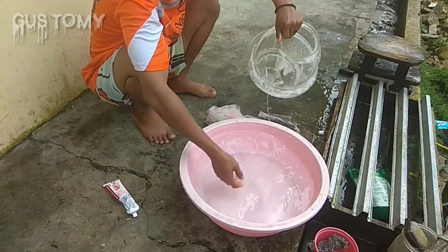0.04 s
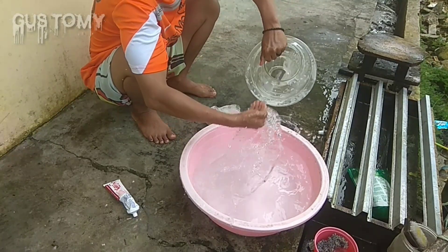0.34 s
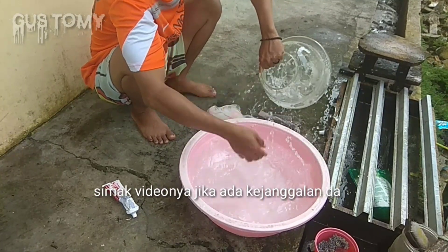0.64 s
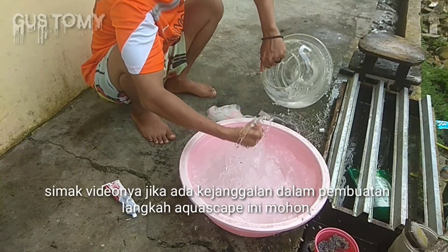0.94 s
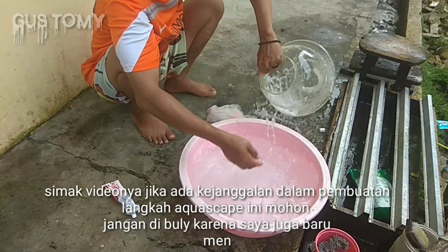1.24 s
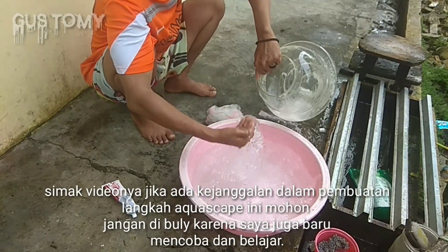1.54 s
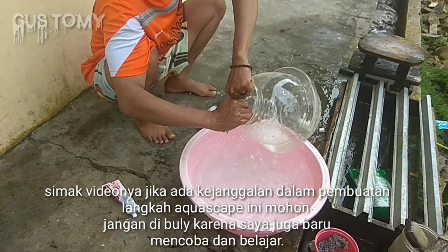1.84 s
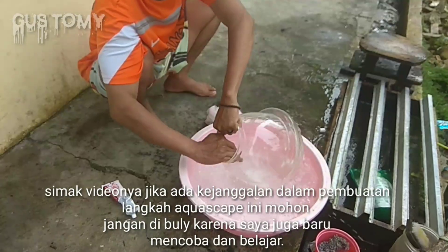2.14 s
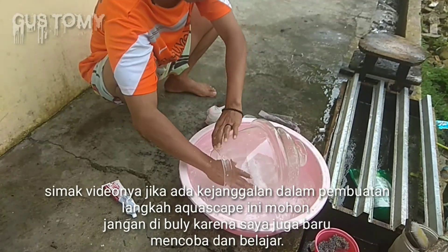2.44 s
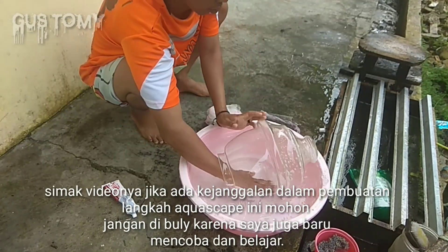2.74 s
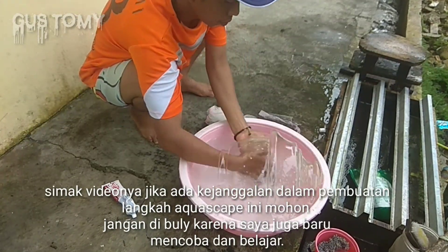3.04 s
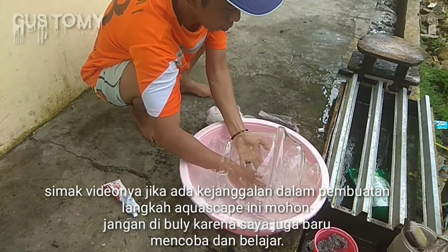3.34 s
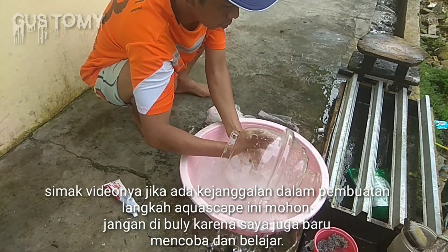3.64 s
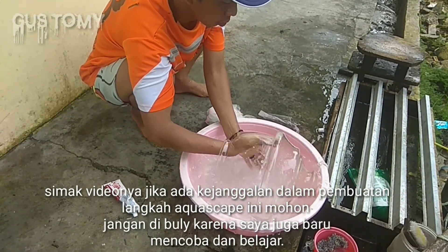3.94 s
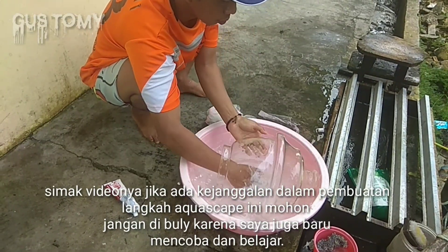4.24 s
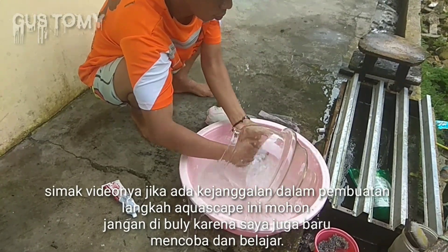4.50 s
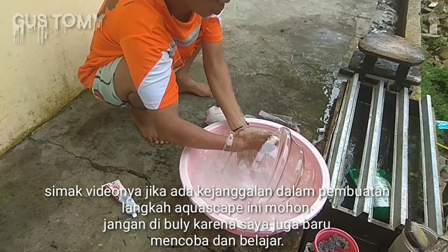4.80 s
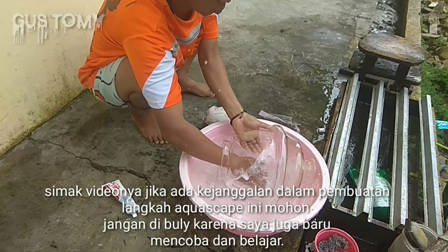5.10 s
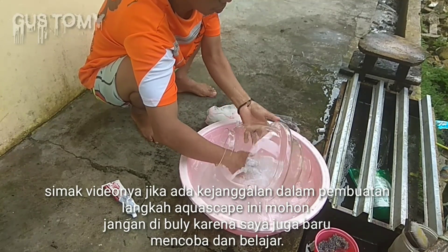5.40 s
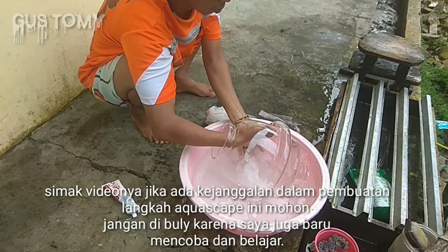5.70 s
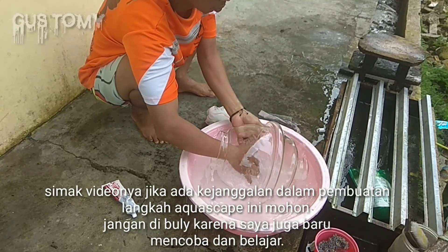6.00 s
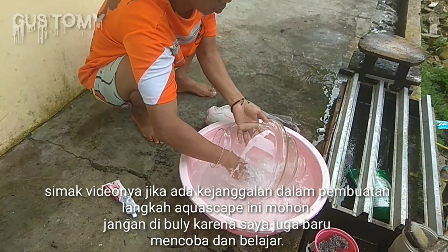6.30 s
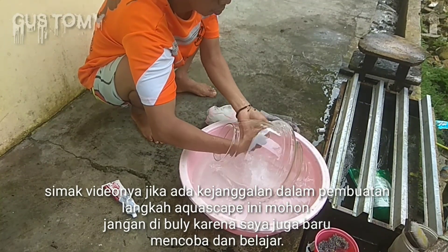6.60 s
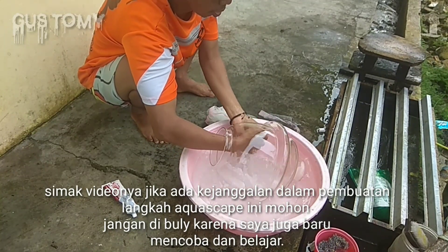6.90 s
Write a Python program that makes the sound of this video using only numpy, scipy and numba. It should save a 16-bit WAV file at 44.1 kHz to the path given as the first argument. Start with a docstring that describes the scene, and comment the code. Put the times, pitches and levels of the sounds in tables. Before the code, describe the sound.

Water sloshes, bubbles and sprays in a plastic basin for about seven seconds as a big glass bowl is rinsed by hand, close and straight ahead in a yard. Hollow gulps and plops open at about 0.3 seconds. Spilled water slaps on wet concrete in sharp, separate splats, several a second from about 1 second, easing between 4.3 and 5, then carrying on to the end. The bowl knocks twice on the basin just after 2 seconds. Bangles tick brightly against the glass now and then, clearest near 0.3, 2.2, 4.5 and 7 seconds. Stronger gulps of trapped air come at about 4.3, 6.1 and 6.9 seconds, and the glass gives one very faint ring at 5.5. Echoes are slight and short. Behind it all, insects keep up a steady high hiss over a faint, distant rumble.

```python
"""Water sloshes in a plastic basin as a big glass bowl is rinsed by hand on a concrete yard.
The water is made of ringing bubbles and tiny drops. The bowl pushes out gulps of air, knocks on the
basin and rings faintly once; bangles tick against the glass. Nearby, slugs of water (small, separate
masses) slap on wet concrete. Insects hiss steadily in the greenery over a faint, distant rumble."""
import sys
import numpy as np
from scipy import signal
from scipy.fft import rfft, irfft, next_fast_len
from scipy.io import wavfile
from scipy.ndimage import uniform_filter1d
from numba import njit

SR = 44100
rng = np.random.default_rng(int(sys.argv[2]) if len(sys.argv) > 2 else 0)


def wrap_up_sound(samples):
    """Save the sound to the file named by the first command line argument, as 16-bit audio."""
    columns = np.atleast_2d(samples).T
    # keep every value between -1 and 1, then stretch to whole-number steps
    tamed = np.clip(columns, -1, 1)
    steps = np.round(tamed * 32767).astype(np.int16)
    wavfile.write(sys.argv[1], SR, steps)


N = 315315
TIME = np.arange(N) / SR
LEFT_RIGHT = np.array([[1], [-1]])   # adds on the left, subtracts on the right

# Levels in dB are relative. A t60 is the time a sound takes to fade by 60 dB.
# hand or bowl pushes into the water: start_s, gulp_db, boom_db, gulp_t60_s, boom_hz
GULPS = [(.258, -33, -59, 0.13, 194), (0.282, -36.5, -44, 0.75, 195), (0.344, -30.5, -60, 0.14, 198),
         (0.991, -39.5, -65, 0.33, 185), (2.088, -45, -36, 0.096, 165.5), (2.189, -57, -46, 0.13, 156),
         (3.332, -47, -47, 0.047, 184), (3.539, -36, -53, 0.086, 196.5), (4.337, -21, -40, 0.084, 202),
         (4.365, -42, -34, 0.57, 197), (4.756, -34, -38.5, 0.066, 187), (4.84, -35, -46, 0.17, 180),
         (6.094, -26, -52, 0.082, 198), (6.124, -49, -37.5, 0.26, 211.5), (6.513, -32.5, -47, 0.25, 200),
         (6.948, -22.5, -44, 0.045, 192), (6.972, -40, -41, 0.29, 222)]
# slugs of water hit the concrete: start_s, crack_db, treble_db, ping_db, pocket_db
SLAPS = [(0.2824, -22, -37, -45, -43), (0.5405, -27, -42, -42, -33), (0.9928, -28.5, -27, -45, -36),
         (1.1397, -28.5, -26, -11.5, -28), (1.208, -47, -44, -45, -27), (1.372, -32.5, -25, -16.5, -27),
         (1.5121, -33, -27, -14.5, -32), (1.757, -31, -41, -22, -45), (1.827, -27, -25, -18, -35),
         (1.9888, -27.5, -29, -20.5, -26), (2.128, -27.5, -29, -17.5, -26), (2.199, -27, -31, -20, -20),
         (2.398, -25, -34, -23, -27), (2.469, -28.5, -42, -27, -32), (2.601, -22.5, -40, -19.5, -22.5),
         (2.682, -26, -31, -23, -22), (2.83, -29.5, -31, -23, -22), (2.9026, -25, -35, -27, -23),
         (3.0133, -30.5, -32, -38, -24), (3.163, -28.5, -26.5, -32, -21), (3.323, -30.5, -42, -34, -24),
         (3.4815, -30, -28.5, -27, -26), (3.706, -24.5, -28.5, -35, -17.5), (3.802, -29, -31, -38, -24),
         (3.954, -29.5, -27, -25, -19), (4.059, -27.5, -25, -32, -18), (4.2713, -30.5, -29.5, -28, -20),
         (4.4778, -44, -31, -40, -48), (4.9052, -51, -31.5, -43, -50), (5.064, -25.5, -27, -12, -44),
         (5.296, -29, -29, -16.5, -31), (5.4366, -27.5, -34, -15, -32), (5.6817, -33, -30, -23, -40),
         (5.7521, -29, -28, -16.5, -34), (5.912, -26, -27, -19, -29), (6.0519, -26, -29, -19, -31),
         (6.122, -29.5, -25.5, -23, -24), (6.322, -27, -33, -20, -31), (6.3928, -31, -32, -32, -31),
         (6.5254, -22.5, -33, -18.5, -22), (6.607, -27, -36, -23, -20), (6.755, -29, -31, -27, -21),
         (6.826, -27.5, -31.5, -36, -22), (6.936, -30, -34, -24, -27), (7.0866, -29.5, -25.5, -33, -22.5)]
# the tone of a slap: pitch_hz, level_db
SLAP_COLOUR = [(150, -41), (500, -11), (900, -26), (1380, -6), (1700, -12), (2600, -7.5), (3200, -16),
               (3750, -5.5), (5000, -12), (5700, -11.5), (6400, -14.5), (7300, -9.5), (8800, -12.5),
               (10000, -8.5), (12300, -12), (13300, -19), (16000, -24)]
# how much water comes with the slaps: time_s, level_db
FLOW = [(1.0, -6.5), (1.4, -2), (2.7, -1), (4.27, -0.5), (4.9, -15), (5.1, -6.5), (5.7, -1), (6.1, -2),
        (6.55, 1.5), (7.1, -2)]


def sloshing(fizz_share=0.6, mist_share=0.61, flung_db=-13.5):
    """Big bubbles churn, small ones tinkle, drops splash and spray, and a few flung drops tick."""
    # the tone of each layer of water: pitch_hz, level_db
    churn_tone = [(125, -9), (190, 4), (260, -13.5), (450, 3), (650, 4), (900, -20.5)]
    bubbling_tone = [(450, -12), (750, 1.5), (1050, 2.5), (1380, 4.5), (1700, 0), (2200, 4)]
    splash_tone = [(1400, -7), (2100, 6), (2600, 7), (3200, 6.5), (3800, 5.5), (5700, -1.5), (6500, -2.5),
                   (9000, -4)]
    spray_tone = [(5000, 5.6), (7000, 4.8), (10000, 11.3), (12000, 8), (13500, 6.1), (16000, 2)]
    bubble_power, splash_power, spray_power = water_motion()
    big = froth(179.6, 725, per_s=300, cycles=20.0, spread_db=2.0)
    churn = water_layer(big, churn_tone, bubble_power, level_db=-13.5, smooth=0.13, flutter_db=-3.5)
    small = froth(643.5, 2027, per_s=500, cycles=65, spread_db=3.0)
    tinkle = water_layer(small, bubbling_tone, bubble_power, level_db=-3.06, smooth=1.43, flutter_db=2)
    drops = droplets(per_s=1200, spread_db=0.0)
    drops += fizz_share * froth(1798, 6030, per_s=900, cycles=66, spread_db=2.5)
    splash = water_layer(drops, splash_tone, splash_power, level_db=-3.0, smooth=1.0, flutter_db=2.0)
    mist = droplets(per_s=8200, spread_db=0.5)
    mist += mist_share * froth(6080, 15190, per_s=990, cycles=250, spread_db=3.0)
    spray = water_layer(mist, spray_tone, spray_power, level_db=3.0, smooth=0.45, flutter_db=2.5)
    flung = low_cut(droplets(per_s=130, spread_db=1.5), hz=1800)
    flung *= np.sqrt(splash_power[0] + spray_power[0]) * from_db(flung_db)   # from the basin only
    return churn + tinkle + splash + spray + flung


def water_motion(attack_s=0.009, t60=0.34, surge_rise_s=0.067, surge_fall_s=0.028):
    """Power of bubbling, splash and spray: the basin laps and sloshes, the puddle surges at each slap."""
    # hand and bowl slosh the water: start_s, hold_s, bubbling_db, splash_db, spray_db
    sloshes = [(0.151, 0.014, -75, -60, -41.5), (0.275, 0.024, -41, -33, -34),
               (.335, 0.053, -38.5, -38, -40), (0.436, 0.11, -53, -45, -52),
               (0.53, 0.038, -38.5, -35, -35.5), (0.599, 0.047, -40, -37.5, -33.5),
               (0.7, 0.075, -62, -56, -39.5), (0.77, 0.051, -56, -40.5, -35),
               (0.85, 0.025, -47.5, -45, -55), (0.915, 0.025, -55, -39, -39.5),
               (0.999, 0.039, -35, -36, -38.5), (1.133, 0.11, -37.5, -39.5, -36.5),
               (1.326, 0.1, -60, -40.5, -37), (1.525, 0.061, -60, -41.5, -54),
               (1.59, 0.016, -35.5, -39.5, -43), (1.743, 0.25, -44, -39, -37),
               (2.075, 0.014, -36, -59, -43), (2.158, 0.039, -39, -34.5, -37),
               (2.532, 0.015, -52, -43, -49), (2.623, .015, -41, -42, -48), (2.777, 0.032, -38, -44, -54),
               (2.964, 0.02, -52, -50, -58), (3.09, .02, -43, -44, -60), (3.173, 0.056, -44.5, -38, -42),
               (3.335, 0.083, -45.5, -39, -40), (3.582, 0.075, -49, -43, -44.5),
               (3.658, 0.0078, -62, -45, -48), (3.76, 0.045, -45, -38, -34.5),
               (3.974, 0.036, -43.5, -39, -41.5), (4.153, 0.038, -53.5, -42, -47),
               (4.305, .02, -44, -41.5, -50), (4.34, 0.027, -38, -39, -39.5),
               (4.486, 0.012, -43, -38, -38.5), (4.595, 0.039, -45, -38.5, -37.5),
               (4.75, 0.012, -41.5, -41.5, -46), (4.846, 0.12, -50.5, -43.5, -49),
               (5.047, 0.011, -41, -39, -46), (5.2, 0.087, -39, -39, -44.5),
               (5.346, 0.0093, -62, -43.5, -47), (5.47, 0.031, -45, -41, -42),
               (5.65, 0.08, -41.5, -44, -52), (5.946, 0.042, -43.5, -48, -47),
               (6.087, 0.074, -41.5, -40.5, -44), (6.198, .02, -44, -54, -57),
               (6.307, 0.026, -60, -43, -45), (6.468, 0.035, -47, -58, -59), (6.67, 0.031, -55, -52, -61),
               (6.918, 0.034, -36.5, -39, -45), (7.013, 0.044, -49, -41, -60)]
    # how strongly the stirred water keeps lapping: time_s, level_db
    stirred = [(.1, -19.5), (.3, 10), (.95, -2), (1.3, 9.5), (2.2, 2), (2.7, -6.5), (3.5, 11.5),
               (4.4, -1.5), (5.1, 8), (5.8, 4), (7.15, 2.5)]
    lapping_db, surge_db = (-52.5, -56.5, -59), (-42, -37, -46)   # each: bubbling, splash, spray
    basin = from_db(np.array(lapping_db)[:, None] + at_time(stirred, TIME)) ** 2
    t = TIME[:SR] - .1
    for s, hold_s, *levels_db in sloshes:
        shape = np.exp(-(np.minimum(t, 0) / attack_s) ** 2) * fade(np.maximum(t - hold_s, 0), t60)
        add(basin, s + t[0], np.outer(from_db(levels_db), shape) ** 2)
    puddle, t = np.zeros((3, N)), TIME[:SR // 2] - .25
    shape = np.exp(-(t / np.where(t < 0, surge_rise_s, surge_fall_s)) ** 2)
    surge = np.outer(from_db(surge_db), shape)
    for s, *_ in SLAPS:
        add(puddle, s + t[0], (surge * from_db(at_time(FLOW, s))) ** 2)
    return np.stack([basin, puddle], axis=1)


def water_layer(grains, tone, power, level_db, smooth, flutter_db, puddle_width=0.15):
    """Bubbles or drops over a smooth hiss flutter as the surface breaks; the puddle sounds narrow."""
    basin, puddle = power
    wash, side = rng.standard_normal((2, N))
    mid = rms_one(colour(grains + smooth * wash, tone)) * np.sqrt(basin + puddle)
    side = rms_one(colour(side, tone)) * np.sqrt(basin + puddle_width ** 2 * puddle)
    return widen(mid, side) * from_db(level_db + flutter_db * drift(per_s=70))


def droplets(per_s, spread_db):
    """Drops land at random moments; more spread makes their sizes more unequal."""
    sizes = from_db(spread_db * np.minimum(rng.exponential(1, N), 4)) * rng.choice([-1, 1], N)
    return rms_one(sizes * (rng.random(N) < per_s / SR))


def froth(low_hz, high_hz, per_s, cycles, spread_db, rise=0.14):
    """Bubbles are born at random, each with its own pitch."""
    births, place = droplets(per_s, spread_db), rng.random(N)
    starts = np.flatnonzero(births)
    pitches = low_hz * (high_hz / low_hz) ** place[starts]
    return rms_one(ring_bubbles(starts, pitches, births[starts] * pitches, float(cycles), rise, SR, N))


@njit
def ring_bubbles(starts, pitches, sizes, cycles, rise, rate, length):
    """Each bubble fades by 60 dB over about `cycles` swings while its pitch climbs by the share `rise`."""
    out = np.zeros(length)
    for start, hz, size in zip(starts, pitches, sizes):
        span, step = int(cycles * rate / hz), 2 * np.pi * hz / rate
        state = size + 0j
        turn = np.exp(1j * step - np.log(1000) / span)   # spins and shrinks the state: a fading tone
        bend = np.exp(1j * step * rise / span)
        for i in range(start, min(start + span, length)):
            out[i] += state.real
            state *= turn
            turn *= bend
    return out


def plops(attack_cycles=1.53, ring_cycles=52.4, waver=0.078, wobble=0.045, top_octaves=0.77, lag_s=7e-5):
    """Single air bubbles ring with a wobbling, gliding pitch; big, low ones ring longer."""
    # air bubbles: start_s, pitch_hz, level_db, rise_octaves_per_s (below zero, the pitch falls)
    bubbles = [(0.332, 268, -43, 3), (.347, 737, -24, -3), (0.355, 1050, -37, 8), (0.571, 322.4, -20, 17.5),
               (.603, 517, -19, 32), (.652, 1057, -33, 4), (.856, 985, -34, -1), (.895, 920, -32, 4),
               (0.913, 1210, -30, -8), (0.945, 1130, -35, 2), (.995, 727, -27, -3.5),
               (1.224, 1060, -22.5, 16), (1.24, 1900, -24, 16), (1.205, 2450, -20.5, 16),
               (1.581, 2120, -12.5, 13), (1.581, 973, -34, 11), (1.62, 864, -28, 8.5), (1.596, 870, -29, 0),
               (1.908, 726, -46, 15), (2.018, 1125, -27.5, -3), (2.11, 758, -32, -10.5),
               (2.172, 917, -19, -3), (2.205, 720, -28, -5), (2.237, 625, -33.5, -9.5),
               (2.304, 733, -36, 38), (2.644, 840, -29.5, -1), (2.785, 1074, -34, 9),
               (3.179, 932, -31.5, 0), (3.189, 1310, -21, 6), (3.575, 900, -31, -3), (3.58, 1230, -29, 5),
               (3.608, 1040, -32, -3), (3.76, 1940, -18.5, -10), (3.857, 1200, -30, -3),
               (4.017, 1065, -31.5, 2), (4.709, 620, -32, 1), (4.982, 1310, -30, -2), (5.245, 944, -33, -7),
               (5.244, 2300, -22, 7)]
    out, t = np.zeros((2, N)), TIME[:SR // 5]
    loudness = 1 + waver * drift(per_s=320)
    shiver = 1 + wobble * drift(per_s=340)
    for s, hz, level_db, rise in bubbles:
        pitch = hz * 2 ** np.minimum(rise * t, top_octaves) * np.interp(s + t, TIME, shiver)
        swell = 1 - np.exp(-(t * hz / attack_cycles) ** 2)
        cycles = np.cumsum(pitch) / SR + hz * lag_s * LEFT_RIGHT / 2   # the left ear hears it first
        add(out, s, from_db(level_db) * np.sin(2 * np.pi * cycles) * fade(t, ring_cycles / hz) * swell)
    return out * loudness


def gulps(attack_s=0.0021, boom_waver=0.09, boom_t60=0.28):
    """Trapped air bursts out under the bowl and the basin booms, its pitch swaying with the water."""
    # the pitches a gulp brings out: pitch_hz, width_hz, level_db
    bands = [(264, 41, 1.5), (356, 160, -6.5), (396.4, 17.4, 10.5), (622, 110, -2.5), (842, 154, 8),
             (1110, 510, -48)]
    bursts, boom, t = np.zeros(N), np.zeros(N), TIME[:SR // 3]
    swell = 1 - np.exp(-t / attack_s)
    sway = 1 + boom_waver * drift(per_s=90)
    for s, gulp_db, boom_db, t60, boom_hz in GULPS:
        add(bursts, s, from_db(gulp_db - 2.5) * swell * fade(t, t60))
        phase = 2 * np.pi * boom_hz * np.cumsum(np.interp(s + t, TIME, sway)) / SR
        add(boom, s, from_db(boom_db) * swell * fade(t, boom_t60) * np.sin(phase))
    air = sum(from_db(db) * resonate(rng.standard_normal(N), hz, width) for hz, width, db in bands)
    even_air = air / np.sqrt(uniform_filter1d(air ** 2, size=600) + 1e-12)
    return low_cut(bursts * even_air + boom, hz=79)


def glugs(cavity_hz=345, t60=0.032, cavity_db=6, upper_ratio=1.96, upper_db=-8,
          sag_octaves_per_s=9, attack_s=0.0026, delay_s=0.00275):
    """The big air cavity of each gulp rings for a moment and sags in pitch."""
    out, t = np.zeros(N), TIME[:SR // 8]
    swell = 1 - np.exp(-(t / attack_s) ** 2)
    for s, gulp_db, *_ in GULPS:
        pitch = cavity_hz * rng.normal(0.95, 0.043) * 2 ** (-sag_octaves_per_s * t)
        phase = 2 * np.pi * np.cumsum(pitch) / SR
        tone = np.sin(phase) + from_db(upper_db) * np.sin(upper_ratio * phase)
        add(out, s + delay_s, from_db(gulp_db + cavity_db) * tone * fade(t, t60) * swell)
    return out


def knocks(reach_octaves=0.16):
    """The bowl knocks on the basin: a soft contact rings its low notes, a hard one the higher ones."""
    # contacts with the basin: start_s, level_db, contact_hz
    contacts = [(2.082, -7, 705), (2.1866, -2.5, 1644)]
    # notes of a knock, cut short by the water: pitch_hz, level_db, t60_s
    notes = [(605, -35, .022), (740, 1, 0.014), (1050, -9, .008), (1450, 2.5, 0.009), (1900, 4, 0.005),
             (2630, -13, .003), (3700, -7, .002)]
    out, t = np.zeros(N), TIME[:SR // 10]
    for s, level_db, contact_hz in contacts:
        for hz, note_db, t60 in notes:
            share = 1 / (1 + (np.log2(hz / contact_hz) / reach_octaves) ** 4)
            add(out, s, from_db(level_db + note_db) * share * ring(t, hz, t60))
    return low_cut(low_cut(out, hz=380), hz=380)


def bowl_ring(attack_s=0.0043, waver=0.26):
    """Free for a moment, the glass holds a faint note that wavers as water washes over it."""
    # a hand lets go: start_s, level_db
    releases = [(5.483, -36.5)]
    # notes of the free bowl: pitch_hz, level_db, t60_s
    notes = [(920, -2, 0.46), (950, -9, .2), (1065, -7, 0.23)]
    out, t = np.zeros(N), TIME[:SR // 2]
    tone = sum(from_db(db) * ring(t, hz, t60) for hz, db, t60 in notes)
    for s, level_db in releases:
        add(out, s, from_db(level_db) * tone * (1 - np.exp(-t / attack_s)))
    return out * (1 + waver * drift(per_s=80))


def bangle_ticks(click_db=-7, click_t60=0.0058, jingle_db=-11, jingle_t60=0.12):
    """Bangles hit the wet glass with a hard click and a few high notes, then jingle on briefly."""
    # hits on the glass: start_s, level_db
    hits = [(0.297, -10.5), (0.8325, -15.5), (1.8142, -16), (2.234, -12), (2.237, -9.5), (2.24, -10),
            (2.4755, -25), (2.481, -23), (2.643, -21), (3.1335, -19.5), (3.397, -14), (4.363, -16.5),
            (4.445, -23.5), (4.502, -12), (6.6497, -14), (7.0577, -10.5)]
    # notes of a tick: pitch_hz, level_db, t60_s
    notes = [(7900, -14, 0.0071), (8500, -44, 0.0073), (9700, -19, 0.0085), (9420, -12, 0.015),
             (9950, -19, 0.018), (11800, -13, 0.0087), (14200, -32, .006)]
    out, t = np.zeros((2, N)), TIME[:SR // 10]
    for s, level_db in hits:
        click, noise = rng.standard_normal((2, 2, len(t)))
        jingle = resonate(noise, hz=9000, width_hz=2800)
        add(out, s, from_db(level_db + click_db) * click * fade(t, click_t60))
        add(out, s, from_db(level_db + jingle_db) * jingle * fade(t, jingle_t60))
        for hz, note_db, t60 in notes:
            ear_gains = from_db(level_db + note_db + rng.normal(0, 2.2, (2, 1)))
            add(out, s, ear_gains * ring(t, hz * rng.normal(1, 0.012), t60))
    return low_cut(out, hz=2200)


def single_drops(t60=0.015, boost_db=6, width=0.35):
    """Each drop smacks on the water with a very short crack and a bright tip."""
    # drops landing: start_s, crack_db, treble_db
    drops = [(0.251, -46, -31), (.2744, -43, -38), (.5857, -42, -36), (1.0304, -38, -35),
             (1.3515, -35, -42), (1.3884, -44, -31), (1.7477, -39, -37), (1.9196, -31, -28),
             (5.246, -36, -42), (5.3102, -23, -30), (5.3756, -32, -39)]
    cracks, treble, t = np.zeros((2, N)), np.zeros((2, N)), TIME[:SR // 40]
    for s, crack_db, treble_db in drops:
        mid, side = np.sign(rng.standard_normal((2, len(t)))) * fade(t, t60)
        burst = mid + width * side * LEFT_RIGHT
        add(cracks, s, from_db(crack_db + boost_db) * burst)
        add(treble, s, from_db(treble_db + boost_db) * burst)
    return low_cut(high_cut(cracks - treble, hz=6000) + treble, hz=1300)


def slaps(attack_s=0.00023, boost_db=3, tail_db=-23, width=0.11, treble_width=0.44,
          rebound_s=0.00487, rebound_rise_s=0.00052, rebound_db=-7, rebound_treble_db=3,
          pocket_hz=2160, pocket_t60=0.022, pocket_waver=0.16, pocket_echo_db=-3):
    """Water cracks twice on concrete; a hard hit pings, a hollow one rings the air pocket under it."""
    # a slap's short ring and a hard slap's ping: pitch_hz, level_db, t60_s
    slap_notes = [(1370, -13.5, 0.025)]
    ping_notes = [(3850, -25, 0.019), (5660, -1, 0.0091), (7580, -1.5, 0.0079), (11800, -11, .008)]
    cracks, treble, rings, pocket = np.zeros((2, N)), np.zeros((2, N)), np.zeros(N), np.zeros(N)
    t = TIME[:SR // 16]
    swell = 1 - np.exp(-t / attack_s)
    first = rms_one(swell * (fade(t, t60=0.019) + from_db(tail_db) * fade(t, t60=0.27)))
    for s, crack_db, treble_db, ping_db, pocket_db in SLAPS:
        # the rest of the slug lands just after, softer and brighter
        late = np.maximum(t - rebound_s * rng.normal(1, 0.035), 0)
        late_swell = 1 - np.exp(-(late / rebound_rise_s) ** 2)
        second = rms_one(late_swell * fade(late, t60=0.014)) * from_db(rebound_db)
        crack_shape = np.hypot(first, second) * from_db(crack_db)
        treble_shape = np.hypot(first, second * from_db(rebound_treble_db)) * from_db(treble_db)
        mid, side = np.sign(rng.standard_normal((2, len(t)))) * from_db(boost_db)
        add(cracks, s, (mid + width * side * LEFT_RIGHT) * crack_shape)
        add(treble, s, (mid + treble_width * side * LEFT_RIGHT) * treble_shape)
        glide = pocket_hz * rng.normal(1, 0.021) * (1 + rng.normal(0, 2.7) * t)
        add(pocket, s, from_db(pocket_db) * swell * ring(t, glide, pocket_t60 * rng.uniform(0.77, 1.25)))
        for notes, strength_db in ((slap_notes, crack_db), (ping_notes, ping_db)):
            for hz, note_db, t60 in notes:
                add(rings, s, from_db(strength_db + note_db) * ring(t, hz * rng.normal(1, 0.012), t60))
    smacks = high_cut(cracks - treble, hz=8000) + treble   # lows from cracks, highs from treble
    pocket *= 1 + pocket_waver * drift(per_s=500)
    return colour(smacks, SLAP_COLOUR) + rings + pocket + echoes(from_db(pocket_echo_db) * pocket[None])


def spatter(lead_s=0.026, patter_db=-24.5, gurgle_db=-44.5, gurgle_s=0.053, width=0.13):
    """Small drops patter just ahead of each slug, and the puddle gurgles around it."""
    patter, stir = np.zeros(N), np.zeros(N)
    for s, *_ in SLAPS:
        flow_db = at_time(FLOW, s)
        near = slice(max(0, int((s - .15) * SR)), int((s + .15) * SR))
        t = TIME[near] - s
        just_before = np.clip((t + lead_s) / 0.0027, 0, 1) * np.clip((.003 - t) / 0.0014, 0, 1)
        patter[near] += from_db(flow_db + patter_db) * just_before
        stir[near] += from_db(flow_db + gurgle_db) * np.exp(-(t / gurgle_s) ** 2)
    drops = droplets(per_s=4000, spread_db=9.0) + width * rng.standard_normal(N) * LEFT_RIGHT
    gurgle = stir * froth(1250, 1420, per_s=1800, cycles=27.5, spread_db=3.5)
    return colour(patter * high_cut(drops, hz=7000), SLAP_COLOUR) + gurgle


def echoes(x, scatter_t60=0.0088, width=0.29):
    """The rough wall and ground send back smeared copies within a few milliseconds."""
    # bounces off wall and ground: delay_s, level_db
    bounces = [(.0052, -13), (0.011, -25)]
    response, t = np.zeros((2, SR // 20)), TIME[:SR // 100]
    for delay_s, level_db in bounces:
        mid, side = rng.standard_normal((2, len(t))) * fade(t, scatter_t60)
        smear = rms_one(mid + width * side * LEFT_RIGHT) / np.sqrt(len(t))
        add(response, delay_s, from_db(level_db) * smear)
    return signal.fftconvolve(x, response, axes=-1)[:, :N]


def yard_tail(x, t60, level_db, dull_hz):
    """Many small echoes from wall, floor and clutter blur into a short tail."""
    t = TIME[:SR // 4]
    tail = rng.standard_normal((2, len(t))) * fade(t, t60) * np.clip(t / 0.0037, 0, 1)
    tail = high_cut(rms_one(tail) / np.sqrt(len(t)), dull_hz)
    return from_db(level_db) * signal.fftconvolve(x, tail, axes=-1)[:, :N]


def insects(main_db=-42.0, octave_db=-46.5, main_pan_db=-1.0, octave_pan_db=2.5, flicker_db=1.3):
    """A chorus of insects hisses from all sides; its upper band is stronger on the left."""
    # the main hiss and the band an octave above: pitch_hz, level_db
    main_tone = [(6400, -24.5), (6800, -4.5), (7300, 2), (7750, 2), (8400, -3.5), (9200, -13)]
    octave_tone = [(12900, -24), (13700, -4.5), (14800, -5), (15700, -2.5)]
    main = rms_one(colour(rng.standard_normal((2, N)), main_tone))
    main *= from_db(main_db + main_pan_db * LEFT_RIGHT)
    octave = rms_one(colour(rng.standard_normal((2, N)), octave_tone))
    octave *= from_db(octave_db + octave_pan_db * LEFT_RIGHT)
    return (main + octave) * from_db(flicker_db * drift(per_s=24))


def outdoors(air_db=-63):
    """A distant rumble comes and goes under the faint, steady sound of the open air."""
    # the tone of the rumble and of the air: pitch_hz, level_db
    rumble_tone = [(36, -4), (50, -0.5), (80, 1), (120, 3.5), (200, -2), (400, -8.5)]
    air_tone = [(100, -10.5), (170, 4), (250, 0.5), (400, -3.5), (750, -5), (1400, -15), (5000, -5.5)]
    # how loud the rumble is: time_s, level_db
    rumble_level = [(0, -81), (.6, -70), (.95, -74), (1.06, -60.5), (4.4, -58), (4.6, -71), (4.9, -71),
                    (5.0, -58.5), (7.15, -57.5)]
    rumble = rms_one(colour(widen(*rng.standard_normal((2, N))), rumble_tone))
    air = rms_one(colour(widen(*rng.standard_normal((2, N))), air_tone))
    return rumble * from_db(at_time(rumble_level, TIME)) + air * from_db(air_db)


def widen(mid, side):
    """Two unrelated signals become a stereo pair, alike in the bass and looser in the treble."""
    # how alike left and right are: pitch_hz, likeness (0 to 1)
    likeness = [(100, 0.97), (300, 0.88), (600, 0.85), (1500, 0.61), (3500, 0.6), (7000, 0.02),
                (15000, 0.027)]
    size = next_fast_len(N) // 2 * 2
    alike = np.clip(at_hz(likeness, np.arange(size // 2 + 1) * SR / size), 0, 1)
    pair = np.sqrt(1 + alike) * rfft(mid, size) + np.sqrt(1 - alike) * rfft(side, size) * LEFT_RIGHT
    return irfft(pair)[:, :N] / np.sqrt(2)


def colour(x, tone):
    """Filter a sound to the given tone, falling steeply past the table's ends."""
    size = next_fast_len(x.shape[-1] + 4096) // 2 * 2
    hz = np.arange(size // 2 + 1) * SR / size + 1
    octaves_outside = np.maximum(0, np.maximum(np.log2(tone[0][0] / hz), np.log2(hz / tone[-1][0])))
    gain = from_db(at_hz(tone, hz) - 24 * np.minimum(octaves_outside, 2))
    # minimum phase: the filter rings after a hit, never before it
    cepstrum = irfft(np.log(gain))
    cepstrum[1:size // 2] *= 2
    cepstrum[size // 2 + 1:] = 0
    return irfft(rfft(x, size) * np.exp(rfft(cepstrum)))[..., :x.shape[-1]]


def resonate(x, hz, width_hz):
    """Let through a band around one pitch."""
    r = np.exp(-np.pi * width_hz / SR)
    feedback = [1, -2 * r * np.cos(2 * np.pi * hz / SR), r * r]
    return signal.lfilter(np.array([1, 0, -1]) * (1 - r * r) / 2, feedback, x + 1e-18)


def low_cut(x, hz):
    """Remove the bass, which small sources cannot give off."""
    return signal.sosfilt(signal.butter(2, hz, "high", fs=SR, output="sos"), x + 1e-18)


def high_cut(x, hz):
    """Gently dull the treble."""
    return signal.lfilter(*signal.butter(1, hz, fs=SR), x)


def drift(per_s):
    """A random wander of typical size 1."""
    knots = rng.standard_normal(4000)
    return rms_one(np.interp(TIME * per_s, np.arange(len(knots)), knots))


def ring(t, hz, t60):
    """A pure tone dying away."""
    return np.sin(2 * np.pi * hz * t) * fade(t, t60)


def fade(t, t60):
    """Fall by 60 dB every t60 seconds."""
    return 1000.0 ** (-t / t60)


def from_db(db):
    """Decibels to gain."""
    return 10 ** (np.asarray(db) / 20)


def rms_one(x):
    """Scale to an average power of 1."""
    return x / np.sqrt(np.mean(x ** 2) + 1e-20)


def at_time(points, s):
    """Read a curve at time s."""
    return np.interp(s, *np.transpose(points))


def at_hz(points, hz):
    """Read a curve at a pitch, with octaves evenly spaced."""
    pitches, values = np.transpose(points)
    return np.interp(np.log(hz + 1), np.log(pitches), values)


def add(out, s, sound):
    """Mix a sound in at time s."""
    start = max(0, round(s * SR))
    out[..., start:start + sound.shape[-1]] += sound[..., :N - start]


def scene():
    """The basin stands straight ahead, beside a wall that carries its low notes on."""
    hollow = low_cut(plops() + from_db(0.5) * gulps() + glugs() + knocks() + bowl_ring(), hz=89)
    basin = hollow + bangle_ticks() + single_drops()
    splats = low_cut(slaps(), hz=540)
    space = from_db(3.5) * echoes(basin)
    space += yard_tail(hollow, t60=0.29, level_db=-7.5, dull_hz=2540)
    space += yard_tail(splats, t60=0.027, level_db=-7, dull_hz=6000)
    return sloshing() + basin + splats + low_cut(spatter(), hz=300) + space + insects() + outdoors()


def record(dry, cutoff_hz=15700):
    """The very highest treble is cut off."""
    return signal.sosfilt(signal.ellip(10, .2, 80, cutoff_hz, fs=SR, output="sos"), dry)


dry = scene()
out = record(dry)
wrap_up_sound(out)
```